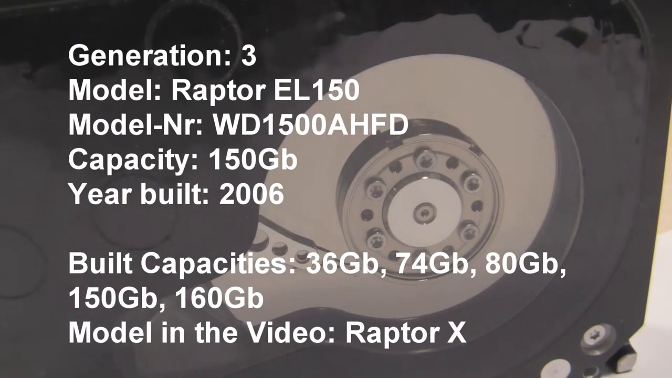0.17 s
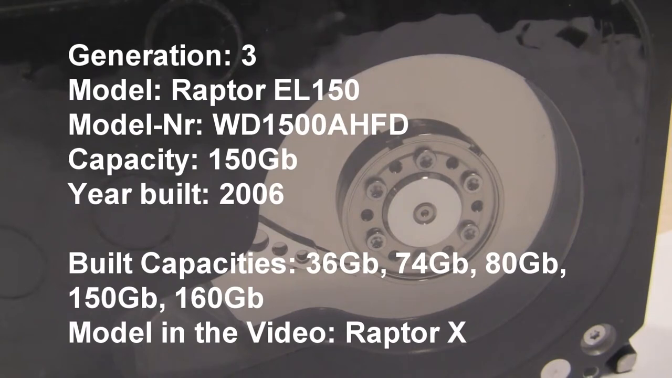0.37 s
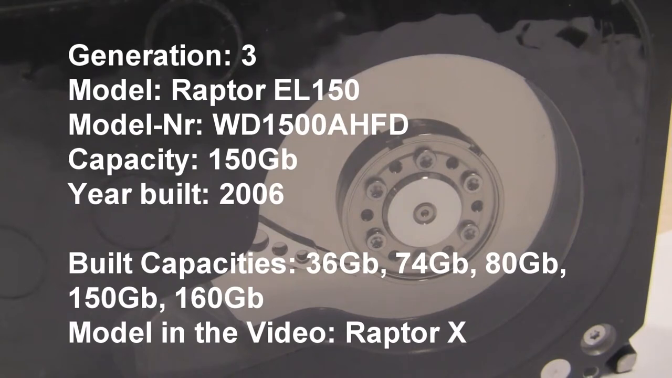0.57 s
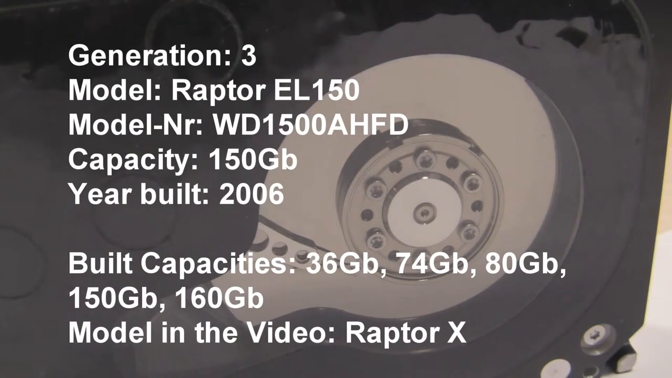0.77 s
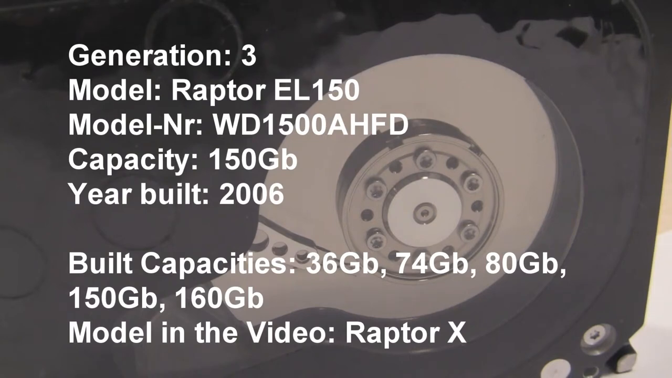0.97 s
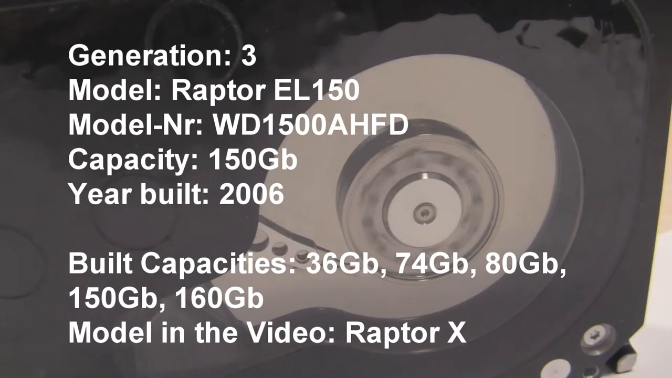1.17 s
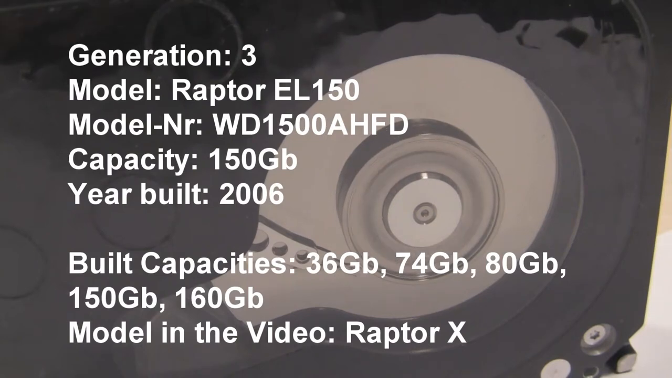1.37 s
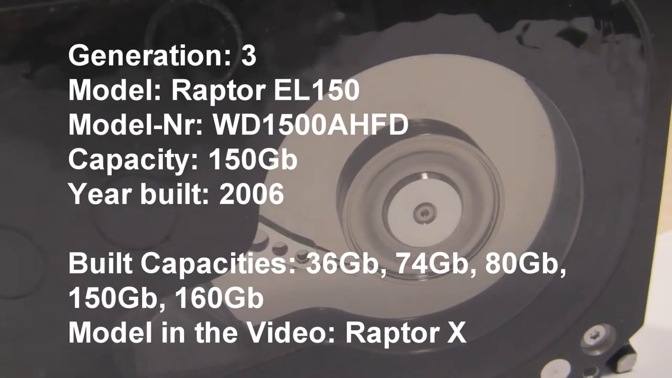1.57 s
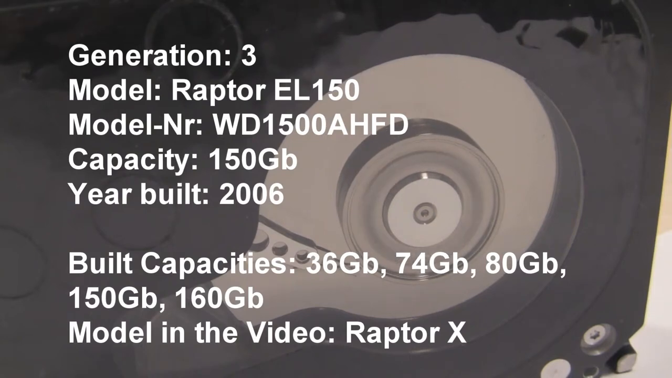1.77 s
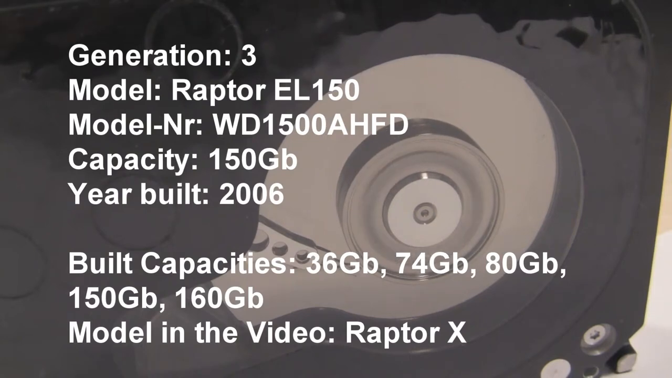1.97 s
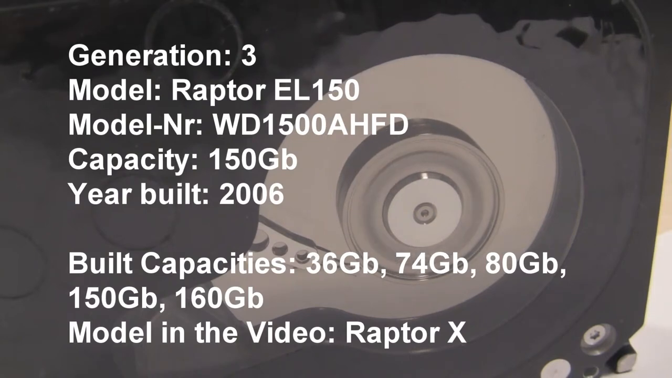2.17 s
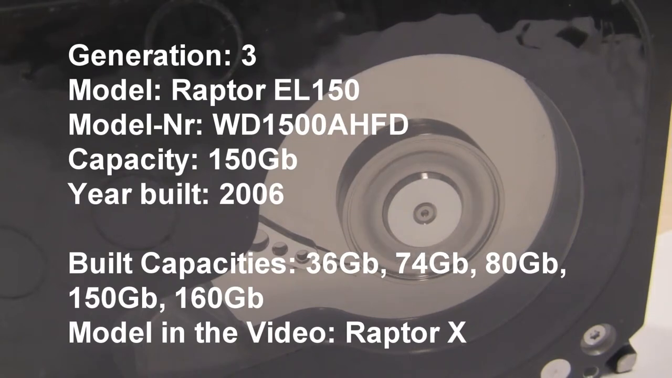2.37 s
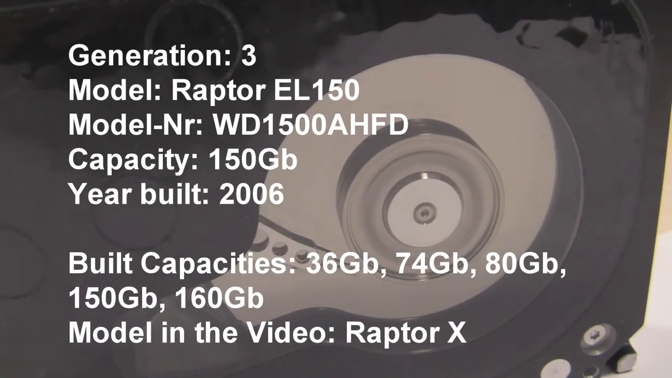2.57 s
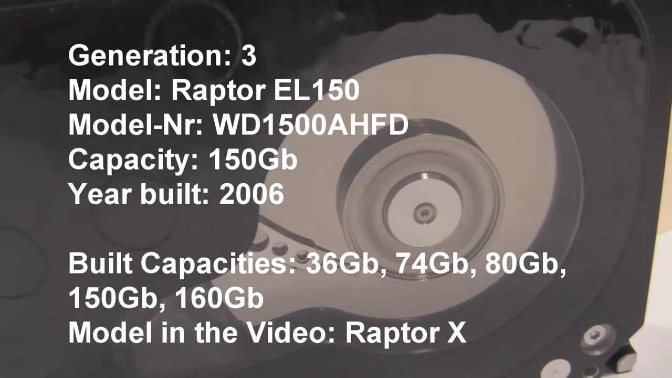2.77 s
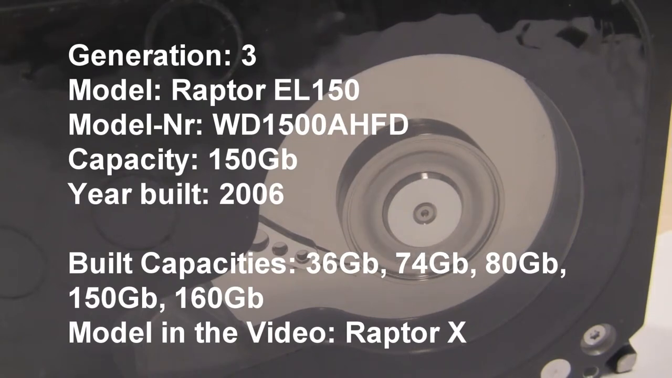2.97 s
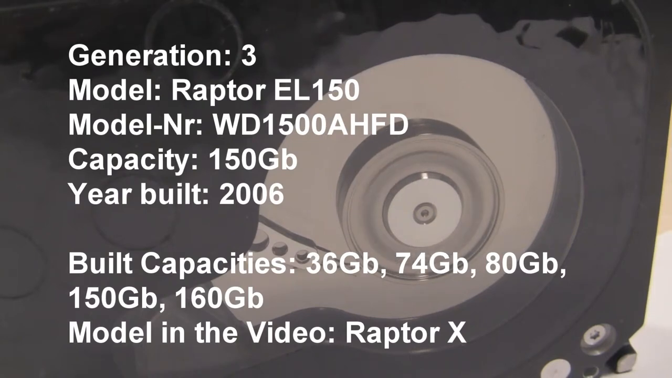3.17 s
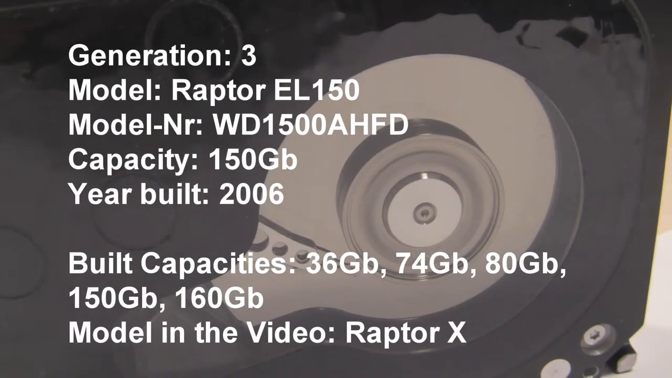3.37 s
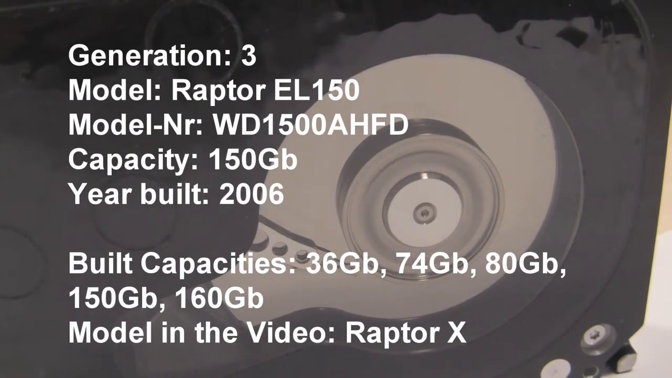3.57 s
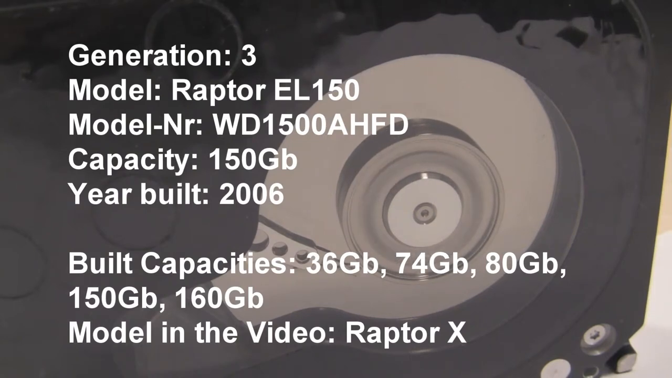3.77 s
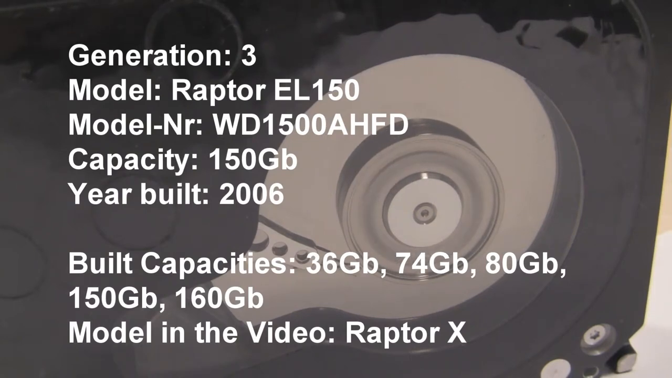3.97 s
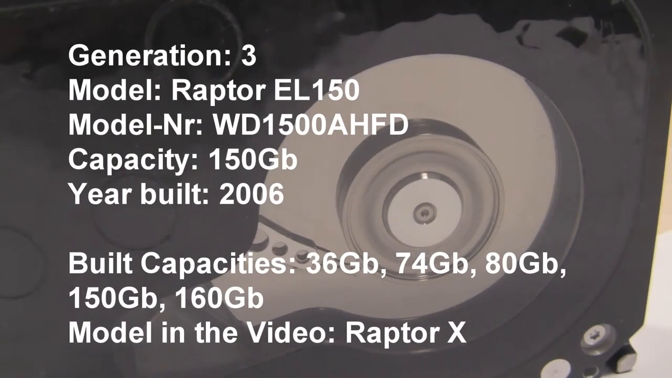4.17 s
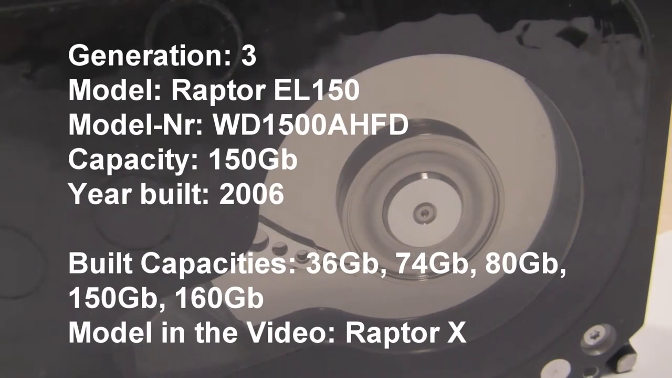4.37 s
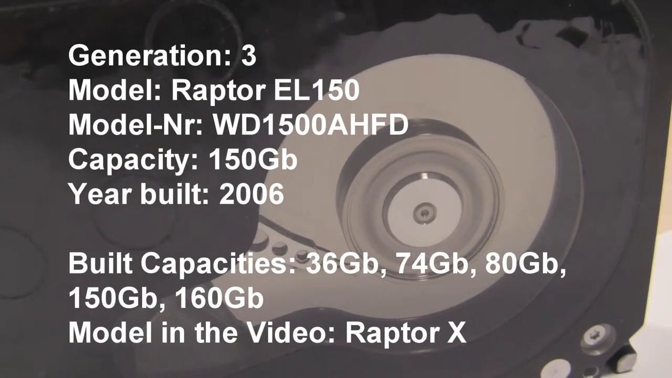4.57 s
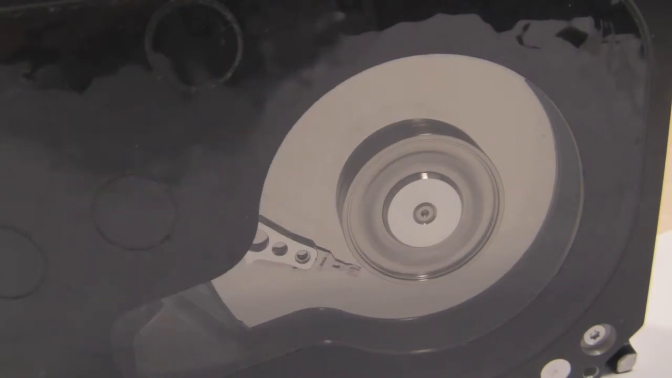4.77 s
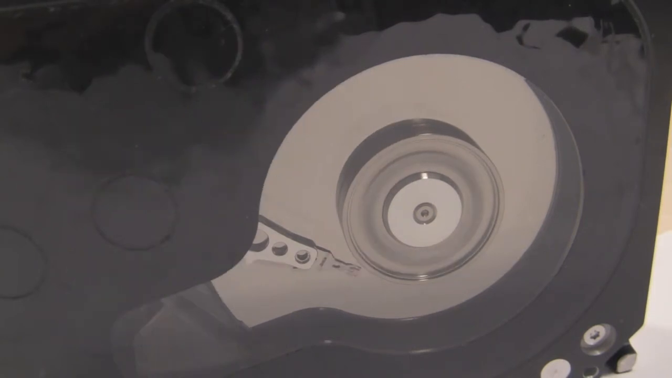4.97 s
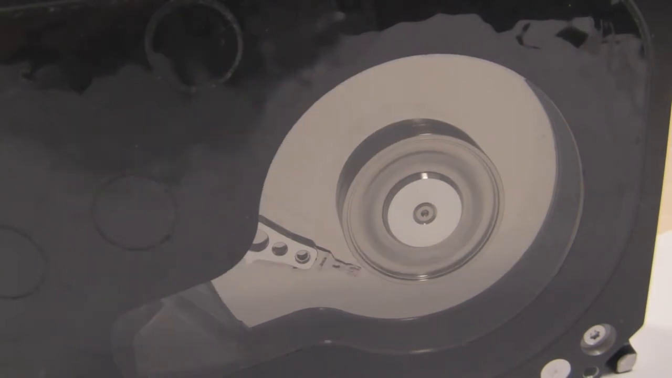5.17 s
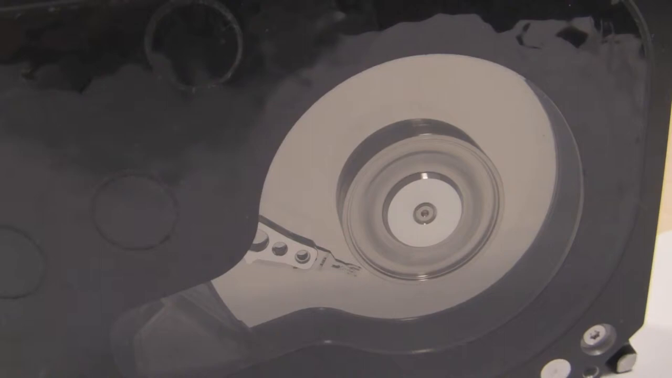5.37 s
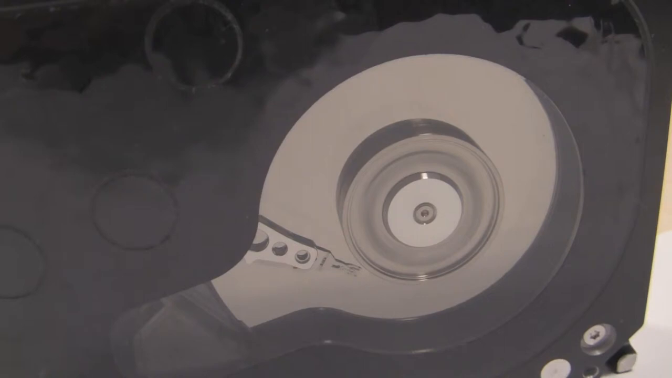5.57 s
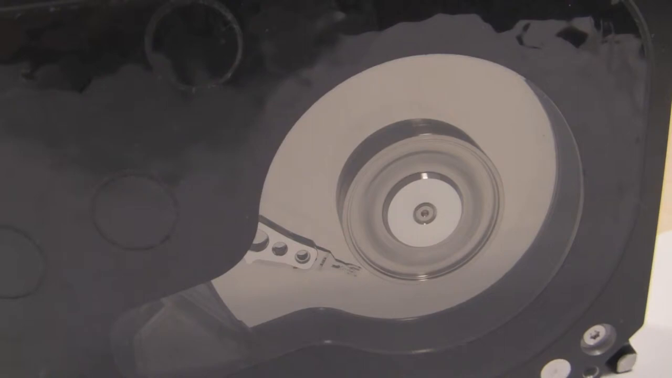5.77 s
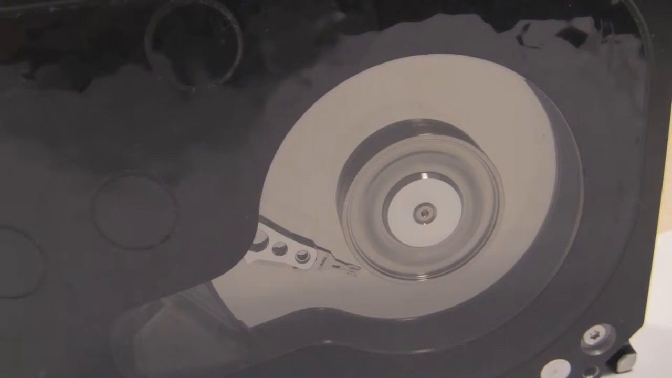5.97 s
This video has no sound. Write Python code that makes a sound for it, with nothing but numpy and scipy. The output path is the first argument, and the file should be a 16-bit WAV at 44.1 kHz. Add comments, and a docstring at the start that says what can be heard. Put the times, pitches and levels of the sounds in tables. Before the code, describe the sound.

Over a low fan hum, a hard drive clacks and knocks, buzzes briefly, then its motor whine climbs steadily with growing airy hiss.

```python
"""Hard drive spin-up beside a fan

Switch and case contacts knock and click: blows ring damped modes and leave short bands of noise and a rumble.
Current pulses then probe and step the motor with a short buzz, each a sharp spit that also rings resonances.
As the platters speed up, multiples of the turning rate climb through resonances as a whine, while coloured
noise gives the growing air rush and current hiss. Steady fan tones hum over dull room noise throughout."""
import sys
import numpy as np
from scipy import signal
from scipy.fft import rfft, irfft, next_fast_len
from scipy.io import wavfile

SR = 44100
rng = np.random.default_rng(int(sys.argv[2]) if len(sys.argv) > 2 else 0)


def to_wav(s):
    """Save 16-bit WAV."""
    ch = np.atleast_2d(s).T  # columns
    pcm = np.round(np.clip(ch, -1, 1) * 32767)  # PCM
    wavfile.write(sys.argv[1], SR, pcm.astype(np.int16))


N = 265702
TIME = np.arange(N) / SR
SIZE = next_fast_len(N + 8192)
FREQS = np.maximum(np.arange(SIZE // 2 + 1) * SR / SIZE, 1)
LEFT_RIGHT = np.array([[1], [-1]])


def from_db(db):
    """Decibels to gain."""
    return np.exp(np.asarray(db) * (np.log(10) / 20))


def rms_one(x):
    """Scale to unit rms."""
    return x / np.sqrt(np.mean(x ** 2) + 1e-20)


def in_time(points):
    """Read a curve at every sample."""
    return np.interp(TIME, *np.transpose(points))


def at_hz(points, hz):
    """Read a spectrum on a log-frequency axis."""
    known_hz, values = np.transpose(points)
    return np.interp(np.log(np.maximum(hz, 1)), np.log(known_hz), values)


def colour(x, gain):
    """Weight each frequency of a sound."""
    return irfft(rfft(x, SIZE) * gain, SIZE)[..., :N]


def drift(rate_hz):
    """Random curve about 0: normal draws of unit spread, rate_hz per second, joined by lines."""
    return np.interp(TIME * rate_hz, np.arange(1024), rng.standard_normal(1024))


# Left-right likeness of noise. Each row: frequency in Hz, correlation (1 = identical).
LIKENESS = [(40, 0.4), (120, 1), (250, 0.41), (1000, 0.96), (4000, 0.63), (9000, 0.85), (12000, 0.027)]


def noise(gain):
    """Stereo noise of a given colour at rms 1, its left-right likeness set by frequency."""
    alike = np.clip(at_hz(LIKENESS, FREQS), -1, 1)
    mid, side = rng.standard_normal((2, N))
    shared = colour(mid, gain * np.sqrt(1 + alike))
    opposed = colour(side, gain * np.sqrt(1 - alike))
    return rms_one(shared + opposed * LEFT_RIGHT)


def ring(clicks, hz, t60_s):
    """A two-pole mode: a unit click starts a decaying sine of initial height 1."""
    radius = from_db(-60 / (t60_s * SR))
    turn = 2 * np.pi * hz / SR
    poles = [1, -2 * radius * np.cos(turn), radius * radius]
    return signal.lfilter([0, np.sin(turn)], poles, clicks + 1e-18)


def resonate(clicks, hz, width_hz):
    """The same ringing, given by its bandwidth."""
    return ring(clicks, hz, np.log(1000) / (np.pi * width_hz))


def humps(resonances, hz):
    """Gain of a set of resonances, their powers summed at the given frequencies."""
    power = sum(from_db(db) ** 2 / (1 + 2 * ((hz - centre_hz) / width_hz) ** 2) ** 2
                for centre_hz, width_hz, db in resonances)
    return np.sqrt(power)


def clicks_at(times_s, sizes):
    """A train of single-sample clicks."""
    out = np.zeros(N)
    out[np.round(np.asarray(times_s) * SR).astype(int)] = sizes
    return out


def crowded_modes(times_s, levels_db, t60_s, low_hz, high_hz, tail_db, tail_t60_s, spread):
    """Modes too dense to count: each blow leaves a quickly dying noise band and a fainter room tail."""
    power = np.zeros(N)
    age_s = TIME[:SR // 2]
    short_t60s = np.maximum(t60_s * np.ones(len(times_s)), .004)
    for s, db, short_s in zip(times_s, levels_db, short_t60s):
        start = int(s * SR)
        direct = 1e6 ** (-age_s / short_s)
        tail = from_db(tail_db) ** 2 * 1e6 ** (-age_s / tail_t60_s)
        power[start:start + len(age_s)] += from_db(db) ** 2 * (direct + tail)
    mid, side = rng.standard_normal((2, N))
    blows = np.sqrt(power) * (mid + spread * side * LEFT_RIGHT)
    band = signal.butter(2, [low_hz, min(high_hz, .45 * SR)], "band", fs=SR, output="sos")
    # make up for the power lost outside the band
    return signal.sosfilt(band, blows + 1e-12) * np.sqrt(SR / 2 / (high_hz - low_hz))


# Switch and case contacts; the rows at 0.6335 and 0.8938 s are echoes of the knocks about 9.5 ms before them.
# Each row: time in seconds, relative levels of body, clack, crack and top in dB, treble t60 in seconds, most
# favoured mode in Hz.
CONTACTS = [(0.6252, -15, -13.5, -27.5, -44, .03, 590), (0.6335, -24, -27, -38, -54, .03, 620),
            (0.724, -29, -22.5, -36, -53, .018, 860), (0.783, -18, -19.5, -35, -52, .025, 830),
            (0.7872, -14, -13.5, -27, -44, .035, 440), (0.837, -36, -29, -36, -49, .02, 900),
            (0.847, -28, -21, -25, -43, .03, 860), (0.875, -36, -33, -38, -54, .035, 830),
            (0.884, -14.5, -13, -30, -36, .018, 490), (0.8938, -22, -21, -37, -54, .02, 285),
            (0.907, -32, -34, -38, -41, .035, 515), (1.015, -39, -37, -37, -39, .03, 425),
            (1.019, -28, -31, -27, -29, .02, 425)]
# Low modes of the case. Each row: frequency in Hz, relative level in dB, t60 in seconds.
CASE = [(155, -4, .26), (200, -17, .2), (257, -8, .22), (286, -7, .29), (318, -16, .2), (390, -13, .12),
        (424, -5.5, .16), (462, -9, .16), (514, -6.5, .16), (544, -11, .12), (600, -13, .18),
        (624, -8, .14), (675, -15, .12), (743, -9, .15), (814, -6.5, .12), (860, -10, .09), (915, -19, .12),
        (1028, -9, .11), (1154, -17, .12)]
# Short, bright case modes rung by the crack. Each row: frequency in Hz, relative level in dB, t60 in seconds.
SHELL = [(1596, -8, 0.043), (1636, -3, 0.1), (1790, 1, 0.022), (2090, -7, 0.048), (2500, -11, 0.035),
         (3180, -4.5, 0.022), (3660, -13.5, .03), (4340, -10, 0.032), (5070, -15, 0.025),
         (7140, -14.5, 0.024)]
FAVOUR_DB, FAVOUR_OCTAVES = 5.5, .14  # boost and reach round the favoured mode
SWING_DB = 6.5  # first swing of the case, re its clack level


def switch(thud_db=-11, snap_db=-3, case_db=-4.5, shell_db=-3, uneven_db=3.0):
    """Each contact jolts the case, thumps its low modes, favouring one pitch, and cracks in its upper ones."""
    s, body_db, clack_db, crack_db, top_db, t60_s, favoured_hz = np.transpose(CONTACTS)
    body = 0
    for k, (hz, db, decay_s) in enumerate(CASE):
        favour_db = FAVOUR_DB * np.exp(-(np.log2(hz / favoured_hz) / FAVOUR_OCTAVES) ** 2)
        scatter_db = uneven_db * rng.standard_normal(len(s))
        strengths = from_db(body_db + db + case_db + favour_db + scatter_db)
        body = body + (-1) ** k * ring(clicks_at(s, strengths), hz, decay_s)
    for k, (hz, db, decay_s) in enumerate(SHELL):
        strengths = from_db(crack_db + db + shell_db + uneven_db * rng.standard_normal(len(s)))
        body = body + (-1) ** k * ring(clicks_at(s, strengths), hz, decay_s)
    swing = ring(clicks_at(s, from_db(clack_db + SWING_DB)), 650, .007)
    snap = ring(clicks_at(s, from_db(crack_db + snap_db)), 3900, .0024)
    jolt = signal.sosfilt(signal.butter(4, 135, "high", fs=SR, output="sos"), body + swing + snap)
    thud = crowded_modes(s, body_db + thud_db, .063, 293, 624, tail_db=-8, tail_t60_s=.4, spread=.19)
    clack = crowded_modes(s, clack_db - 1.5, .021, 515, 1000, tail_db=-17.5, tail_t60_s=.28, spread=.27)
    crack = crowded_modes(s, crack_db, t60_s, 930, 2760, tail_db=-15.5, tail_t60_s=.28, spread=.44)
    edge = crowded_modes(s, top_db - 4.5, t60_s, 2300, 9100, tail_db=-17, tail_t60_s=.3, spread=.32)
    top = crowded_modes(s, top_db - 7.5, t60_s, 7100, 10000, tail_db=-10.5, tail_t60_s=.18, spread=.35)
    treble_cut = signal.butter(8, 11800, fs=SR, output="sos")
    return signal.sosfilt(treble_cut, jolt + thud + clack + crack + edge + top)


# Single current pulses before the steady stepping. Each row: time in seconds, relative level in dB.
PROBES = [(1.287, 1), (1.293, 1.5), (1.304, 1.5), (1.315, 2.5), (1.326, 4.5)]
STEP_START_S, STEP_END_S, STEP_HZ = 1.3371, 1.571, 180.6
# Colour of each pulse. Each row: frequency in Hz, relative level in dB per Hz.
PULSE = [(400, -40), (1500, -4), (3200, -26), (4500, -12), (5800, -2), (6600, -7), (7350, 4.5), (8100, -4),
         (9000, 4), (10200, -6), (11200, -5), (12200, -37), (15500, -41)]
GRIT_DB = -9  # fresh grit, re the repeating part of a pulse
# Resonances rung by the stepping. Each row: frequency in Hz, width in Hz, level while stepping in dB rms.
BUZZ = [(365, 16, -44.5), (883, 10, -55.5), (1080, 40, -58), (1265, 25, -67), (1421, 14, -67),
        (1604, 14, -64), (1809, 30, -68), (1990, 30, -73), (2169, 30, -74), (2335, 45, -63),
        (2520, 65, -59), (3252, 30, -77), (3800, 50, -67), (3985, 40, -72), (4165, 40, -76),
        (4910, 60, -74)]
RING_HZ = 2000  # the swell below shapes resonances above this
# Swell of the upper ringing. Each row: time in seconds, relative level in dB.
RING_SWELL = [(1.29, 4), (1.33, 1), (1.375, 9.5), (1.41, -12), (1.438, -2), (1.465, -16), (1.52, 6.5),
              (1.555, -8), (1.58, -3)]
LURCH_DB = -44.5  # jerk of each probe, re its own level
TWITCH_S, TWITCH_DB = 1.2376, -31
# Coil resonances rung by its first twitch. Each row: frequency in Hz, width in Hz, relative level in dB.
COIL = [(3520, 210, -12), (4900, 1200, 2.5), (7460, 380, 2.5), (9900, 1400, -21)]
SHAKE = [(150, -6), (300, 9.0), (900, -16.0), (2000, -16), (2900, -23)]  # Hz, relative dB per Hz


def motor_start(pulse_db=-47.0, shake_db=-60, rattle_db=3.5):
    """Current pulses probe the rotor, then step it round: each is a sharp spit, and together they buzz."""
    steps_s = np.arange(STEP_START_S, STEP_END_S, 1 / STEP_HZ)
    steps_s = steps_s + np.cumsum(2.6e-5 * rng.standard_normal(len(steps_s)))
    probes_s, probes_db = np.transpose(PROBES)
    pulses = clicks_at(probes_s, from_db(probes_db)) + clicks_at(steps_s, np.ones(len(steps_s)))
    stepping = (TIME > STEP_START_S) & (TIME < STEP_END_S)
    dying = 1000 ** (-TIME[:1024] / .009)
    # the windings smear each pulse alike, with fresh grit on top
    smear = rfft(dying * rng.standard_normal(len(dying)), SIZE)
    answer = rms_one(colour(pulses, smear / abs(smear)))
    grit = rms_one(signal.fftconvolve(pulses, dying)[:N] * noise(1))
    spit = colour(answer + from_db(GRIT_DB) * grit, from_db(at_hz(PULSE, FREQS)))
    out = from_db(pulse_db) * spit / spit[:, stepping].std()

    uneven = pulses * (1 + .2 * rng.standard_normal(N))
    for hz, width_hz, level_db in BUZZ:
        swell_db = rattle_db * drift(25.43) + (hz > RING_HZ) * in_time(RING_SWELL)
        tone = resonate(uneven, hz, width_hz) * from_db(swell_db)
        out = out + from_db(level_db) * tone / tone[stepping].std()

    # the jerking rotor also shakes the frame
    shake = rms_one(colour(grit, from_db(at_hz(SHAKE, FREQS))))
    out = out + from_db(shake_db) * shake
    lurches = clicks_at(probes_s, from_db(probes_db + LURCH_DB))
    out = out + resonate(lurches, 274, 40) + resonate(lurches, 1080, 120)

    twitch = clicks_at([TWITCH_S], from_db(TWITCH_DB))
    tick = sum(from_db(db) * resonate(twitch, hz, width_hz) for hz, width_hz, db in COIL)
    tick_band = signal.butter(3, [2600, 10500], "band", fs=SR, output="sos")
    return out + signal.sosfilt(tick_band, tick)


# Run-up: even gain at first, then ever slower. Each row: time in seconds, turns per second.
SPEED = [(1.571, 7.5), (2.03, 27.65), (2.28, 38.88), (2.52, 49.65), (2.8, 61.9), (3.1, 74.43), (3.4, 86.35),
         (3.7, 97.66), (4.0, 108.42), (4.3, 118.6), (4.6, 128.22), (4.9, 137.35), (5.2, 146.04),
         (5.5, 154.24), (5.85, 163.26), (5.985, 166.7)]
WORKING_HZ = 166.7


def spindle_speed():
    """Turns per second; at rest until the stepping hands over."""
    return np.interp(TIME, *np.transpose(SPEED), left=0)


def with_speed(db_per_doubling):
    """Gain that grows as a power of the speed: 0 at rest, 1 at working speed."""
    return (spindle_speed() / WORKING_HZ) ** (db_per_doubling / (20 * np.log10(2)))


EASE_S, EASE_LAG_S, EASE_DB = 5.89, .063, 15  # start, time constant, final drop


def current_db():
    """Motor current: full during the run-up, easing just short of working speed."""
    return -EASE_DB * (1 - np.exp(-np.maximum(TIME - EASE_S, 0) / EASE_LAG_S))


# Motor tones, mostly multiples of the four pole pairs. Each row: multiple of the turning rate,
# level at working speed in dB before the housing, growth in dB per doubling of speed.
ORDERS = [(11, -49.7, 3.6), (12, -46.5, 2), (13, -55.4, -1.4), (15, -64.9, -2.6), (16, -59.5, -4.9),
          (17, -59.3, 1.8), (20, -61.4, -0.4), (21, -64.5, 2.7), (23, -65.4, 6.0), (24, -60.6, -1.2),
          (28, -64.9, -0.7), (29, -68.7, 0.6), (31, -74.2, 0.3), (32, -66.4, -1.4), (33, -70.6, -0.2),
          (35, -79.3, -5.8), (36, -60.4, 6.4), (37, -66.0, 6.5), (40, -67.6, 4.5), (41, -76.2, -2.1),
          (44, -70.5, 2.9), (45, -80.7, -3.5), (48, -65.3, 7.9), (49, -77.5, 0.0), (52, -67.8, 5.3),
          (56, -69.1, 5.9), (57, -81.4, 0.1), (60, -67.7, 4.1), (64, -69.7, 6.0), (68, -66.9, 8.8),
          (72, -64.8, 5.9), (76, -70.1, 6.7), (80, -71.9, 6.1), (84, -67.1, 10.5), (88, -68.7, 7.4),
          (92, -68.0, 8.6), (96, -69.8, 7.4), (100, -71.9, 6.8), (104, -78.0, 1.5)]
# How well the housing radiates them. Each row: frequency in Hz, gain in dB.
HOUSING = [(500, -28), (800.0, -13.1), (950.0, -13.3), (1150.0, -10.4), (1400.0, -13.0), (1500.0, -10.3),
           (1575, 0), (1660, -10), (1850.0, -5.2), (2020.0, -7.2), (2250.0, 0.8), (2530.0, 3.8),
           (2800.0, -14.5), (3130.0, -1.2), (3400.0, -14.6), (3700.0, -1.0), (3920.0, 1.3), (4150.0, -4.1),
           (4400.0, -14.8), (4900.0, -2.2), (5250.0, -7.9), (5700.0, -6.3), (6150.0, -4.5), (6800.0, 1.0),
           (7400.0, 2.7), (7800.0, 1.6), (8250.0, -3.2), (8800.0, 3.3), (9400.0, 3.3), (10000.0, 4.6),
           (10450.0, -10.6), (10950.0, 0.4), (11500.0, -14.5), (13000.0, -18.7)]
LEAD_ORDER, LEAD_DB = 25, -71  # strongest tone: multiple, dB rms between resonances
# Motor resonances it sweeps through. Each row: frequency in Hz, width in Hz, peak level in dB rms.
STATOR = [(1150, 240, -69), (1420, 170, -68), (1840, 160, -55), (2200, 170, -52), (2520, 170, -49),
          (3110, 200, -59.5), (3700, 180, -57), (3925, 120, -47)]
POLE_ORDERS = (32, 36)  # multiples that also ring the frame
# Frame resonances, met early in the run-up. Each row: frequency in Hz, width in Hz, peak level in dB rms.
FRAME = [(930, 200, -62), (1400, 180, -66.5)]
WHISTLE_ORDER = 72
# Hub resonances this multiple whistles through. Each row: frequency in Hz, width in Hz, peak level in dB rms.
WHISTLE = [(4900, 260, -76), (5800, 420, -73.5), (6950, 700, -66.5)]
WHINE_FOLLOWS = .35  # share of the current's dB drop


def whine(imbalance_db=-47, flutter_db=-1.7, sway_db=1.5):
    """Multiples of the turning rate swell as they glide through the drive's resonances."""
    speed_hz = spindle_speed()
    turning = speed_hz > 0
    doublings = np.log2(np.maximum(speed_hz, 1) / WORKING_HZ)
    strength = from_db(WHINE_FOLLOWS * current_db()) * turning
    angle = 2 * np.pi * np.cumsum(speed_hz) / SR
    # the spindle's imbalance hums only near full speed
    imbalance = from_db(imbalance_db) * (speed_hz / WORKING_HZ) ** 8
    out = imbalance * np.sqrt(2) * np.sin(angle) * np.ones((2, 1))
    # above the main resonances, crowded small ones ripple the level
    ripple_hz = np.arange(4200, 16000, 170)
    ripple_db = 1.5 * rng.standard_normal(len(ripple_hz))

    lead_gain = np.hypot(humps(STATOR, LEAD_ORDER * speed_hz), from_db(LEAD_DB)) * turning
    partials = [(LEAD_ORDER, lead_gain)]
    for order, db, growth_db in ORDERS:
        hz = order * speed_hz
        radiated_db = at_hz(HOUSING, hz) + np.interp(hz, ripple_hz, ripple_db, left=0)
        bass_loss = np.minimum(hz / HOUSING[0][0], 1) ** 2
        gain = strength * bass_loss * from_db(db + growth_db * doublings + radiated_db)
        if order in POLE_ORDERS:
            gain = np.hypot(gain, humps(FRAME, hz))
        if order == WHISTLE_ORDER:
            gain = np.hypot(gain, humps(WHISTLE, hz))
        partials.append((order, gain))

    for order, gain in partials:
        wave = np.sqrt(2) * np.sin(order * angle + rng.uniform(0, 2 * np.pi))
        tone = gain * from_db(flutter_db * drift(45)) * wave
        sway = from_db(sway_db * drift(8.2))
        out += [tone * sway, tone / sway]  # left, right
    return out


# Platter and cover resonances. Each row: frequency in Hz, width in Hz, relative level in dB.
PLATTERS = [(827, 63, 3), (903, 98, -7), (1058, 107, -1.5), (1220, 61, -16), (1598, 57, -5.5),
            (1713, 187, -9.5), (1985, 174, -10), (2500, 160, -36), (2920, 240, -18.5), (3900, 570, -26)]
# Broad hiss of the air. Each row: frequency in Hz, relative level in dB per Hz.
AIR = [(60, -35), (300, -40), (700, 13), (1400, -15), (2500, 9), (4700, 2), (7500, 4), (9500, -17),
       (12000, -10), (15500, -34)]
RUSH_DB, RUSH_DB_PER_DOUBLING = -35.5, 13  # level at working speed, growth with speed


def air_rush(hiss_db=-14, gust_db=0.86):
    """Turbulence, growing roughly as speed squared, shakes the platters and cover and hisses faintly."""
    flutter = noise(humps(PLATTERS, FREQS)) * from_db(gust_db * drift(35))
    hiss = from_db(hiss_db) * noise(from_db(at_hz(AIR, FREQS)))
    return from_db(RUSH_DB) * with_speed(RUSH_DB_PER_DOUBLING) * (flutter + hiss)


# Colour of the current's hiss. Each row: frequency in Hz, relative level in dB per Hz.
WINDINGS = [(1500, -14), (2450, -0.5), (2850, -18.5), (3850, -3.5), (4500, -19), (5500, -25), (6500, -9),
            (7350, -2), (8100, -5), (8950, 2), (9500, -4), (10000, -1.5), (10500, -7), (11000, -6),
            (12000, -11.5), (15500, -26)]
# Swell of that hiss. Each row: time in seconds, relative level in dB.
HISS_SWELL = [(1.63, 2.5), (1.82, -0.5), (1.935, 1.5), (1.96, -2), (1.98, 4.5), (2.0, -1), (2.13, 1),
              (2.18, 3.5), (2.48, 4), (3.0, 0.5), (3.3, 2.5), (3.9, 2), (4.7, 2.5), (5.6, -.5)]
CHOP_DB = -61  # steady part
SIZZLE_DB, SIZZLE_DB_PER_DOUBLING = -49.5, 17  # growing part: level at working speed, growth


def motor_hiss(flicker_db=0.76):
    """The chopped current sizzles in the windings, more as the motor speeds up, until full speed is near."""
    sizzle = from_db(SIZZLE_DB) * with_speed(SIZZLE_DB_PER_DOUBLING)
    level = np.hypot(from_db(CHOP_DB), sizzle) * (TIME > STEP_START_S)
    swell_db = current_db() + in_time(HISS_SWELL) + flicker_db * drift(90)
    return level * from_db(swell_db) * noise(from_db(at_hz(WINDINGS, FREQS)))


# Colour of the rumble. Each row: frequency in Hz, relative level in dB per Hz.
RUMBLE_COLOUR = [(22, -18), (38, -14), (57, 5), (80, -5), (130, -22), (500, -67)]
RUMBLE_DB = -42.5  # re each contact's body level
RUMBLE_ATTACK_S, RUMBLE_T60_S = .018, 3.7


def rumble():
    """Each knock leaves the support trembling: low noise that swells fast and dies slowly."""
    power = 0
    for s, body_db, *_ in CONTACTS:
        age_s = np.maximum(TIME - s, 0)
        attack = 1 - np.exp(-age_s / RUMBLE_ATTACK_S)
        decay = np.exp(-np.log(1000) * age_s / RUMBLE_T60_S)
        power = power + (from_db(RUMBLE_DB + body_db) * attack * decay) ** 2
    return np.sqrt(power) * noise(from_db(at_hz(RUMBLE_COLOUR, FREQS)))


# Steady fan tones. Each row: frequency in Hz, level in dB rms.
FAN = [(118.4, -65.5), (166.9, -54), (290.7, -51.5), (511.4, -61.5), (543.7, -65.5), (576.0, -61),
       (640.6, -65.5), (672.9, -73)]
# Room noise. Each row: frequency in Hz, relative level in dB per Hz.
ROOM = [(25, -25), (60, -9.5), (100, -12), (165, 6), (215, -0.5), (270, 3), (350, -3.5), (520, -1.5),
        (700, -6), (900, -7), (1400, -16.5), (2000, -15), (3000, -22.5), (6000, -27), (10000, -32.5),
        (15500, -39)]
ROOM_DB = -50


def fan(waver_db=1.0, wander_hz=0.86):
    """Fan tones, slightly unsteady in pitch and level, over the room's dull noise."""
    tones = 0
    for hz, db in FAN:
        angle = 2 * np.pi * np.cumsum(hz + wander_hz * drift(9)) / SR
        tones = tones + from_db(db + waver_db * drift(3.08)) * np.sqrt(2) * np.sin(angle)
    return tones + from_db(ROOM_DB) * noise(from_db(at_hz(ROOM, FREQS)))


# Stereo balance. Each row: frequency in Hz, left minus right in dB.
BALANCE = [(130, 1), (350, -3), (700, -3), (1400, -1.3), (3000, -.5), (9000, -0.5)]


def scene():
    """Sum of all sources, leaning slightly right except in the bass."""
    sound = switch() + rumble() + motor_start() + whine() + air_rush() + motor_hiss() + fan()
    return colour(sound, from_db(at_hz(BALANCE, FREQS) * LEFT_RIGHT / 2))


CUTOFF_HZ = 15750


def record(dry):
    """A steep elliptic low-pass cuts the top."""
    return signal.sosfilt(signal.ellip(10, .1, 90, CUTOFF_HZ, fs=SR, output="sos"), dry)


dry = scene()
out = record(dry)
to_wav(out)
```